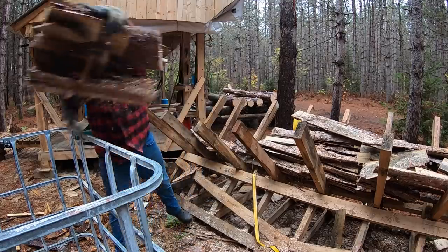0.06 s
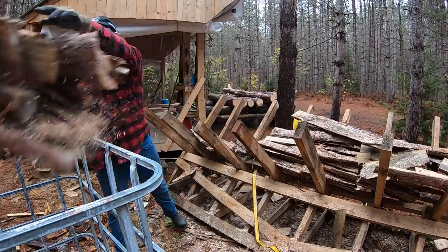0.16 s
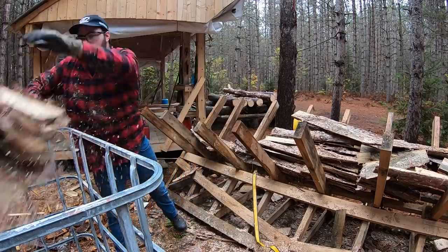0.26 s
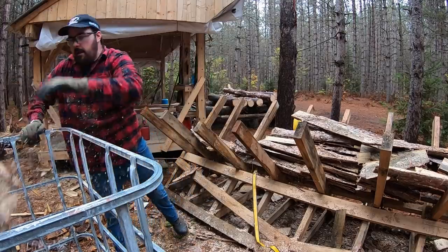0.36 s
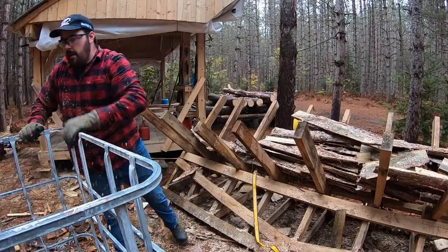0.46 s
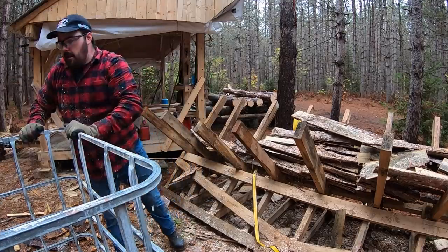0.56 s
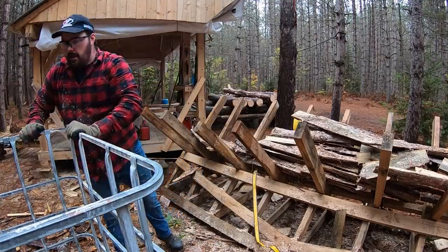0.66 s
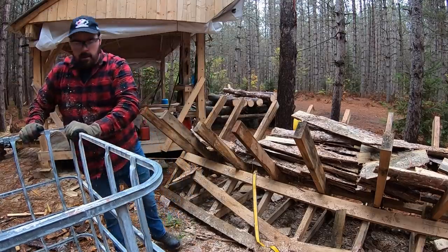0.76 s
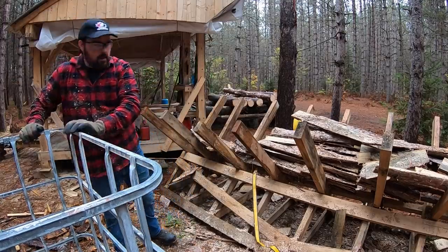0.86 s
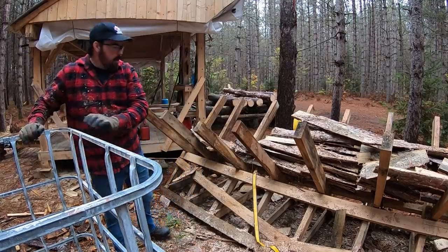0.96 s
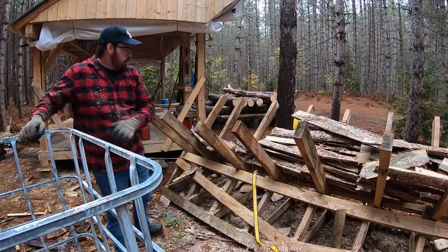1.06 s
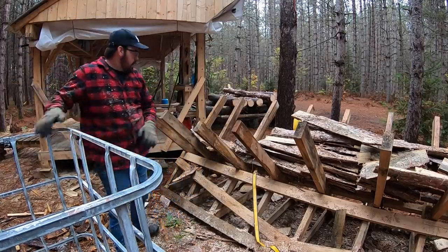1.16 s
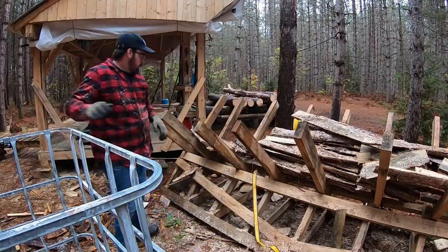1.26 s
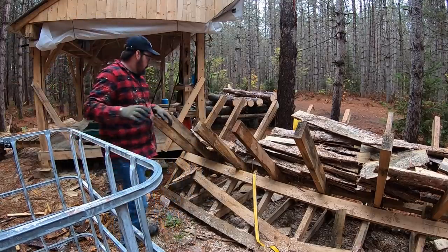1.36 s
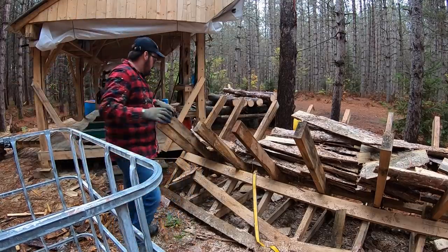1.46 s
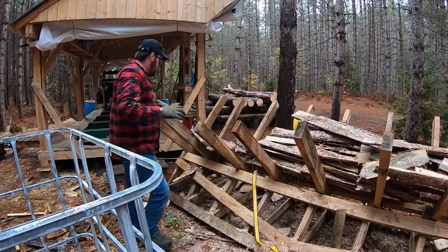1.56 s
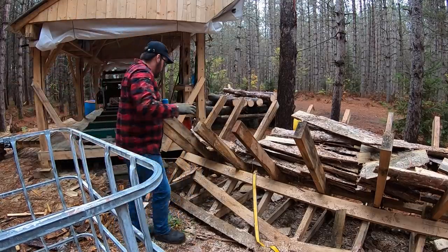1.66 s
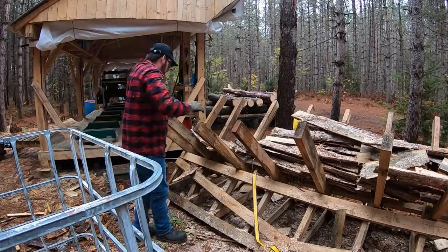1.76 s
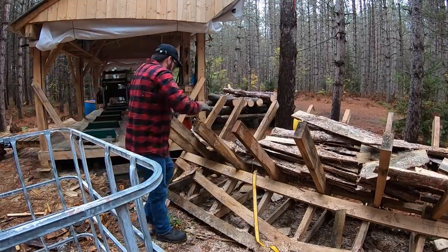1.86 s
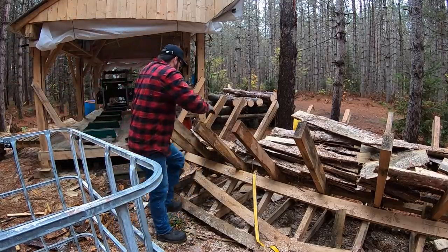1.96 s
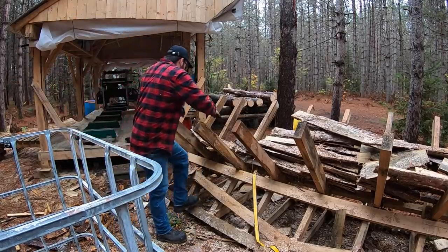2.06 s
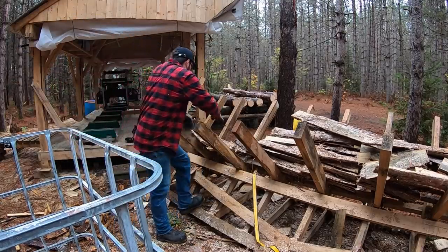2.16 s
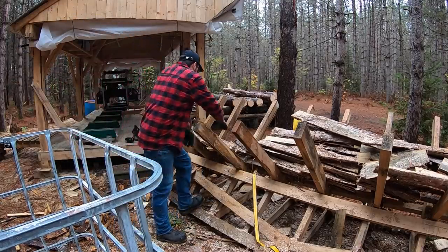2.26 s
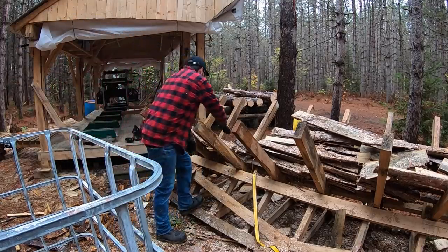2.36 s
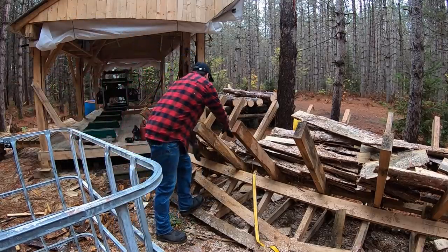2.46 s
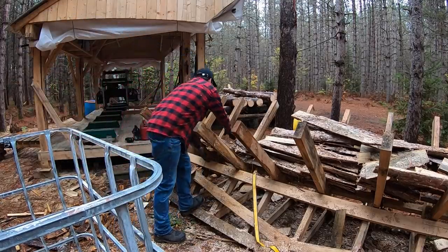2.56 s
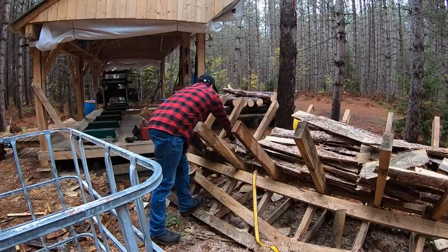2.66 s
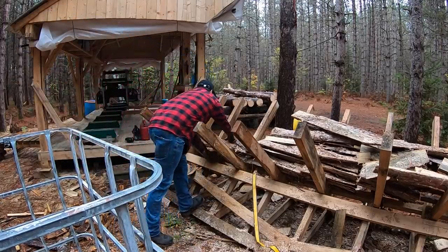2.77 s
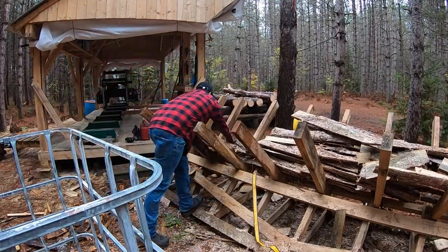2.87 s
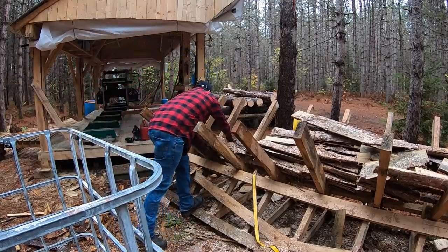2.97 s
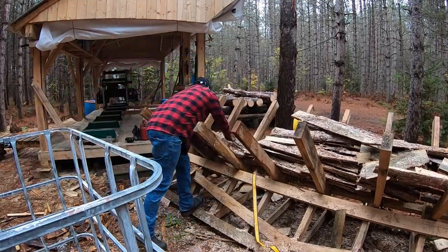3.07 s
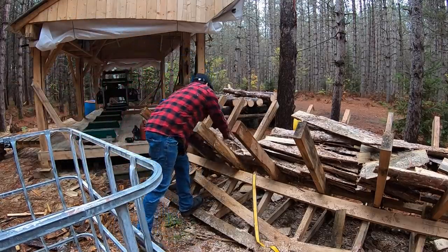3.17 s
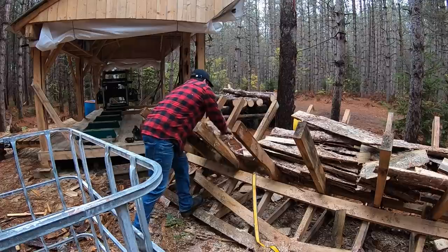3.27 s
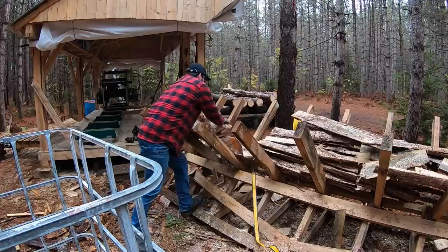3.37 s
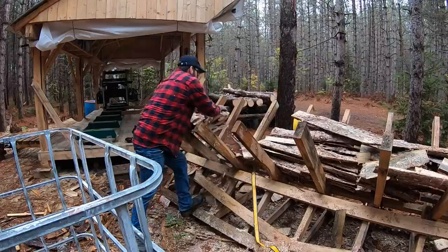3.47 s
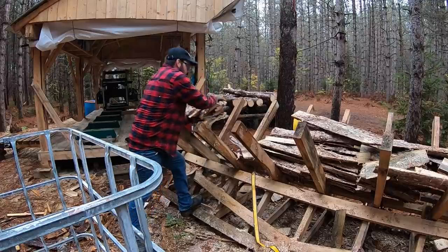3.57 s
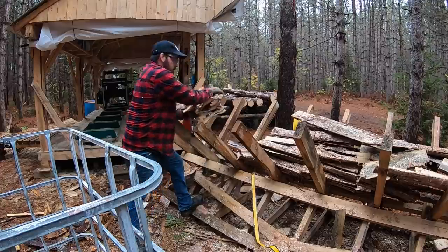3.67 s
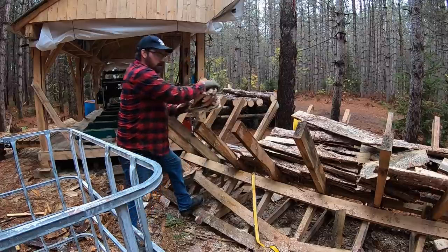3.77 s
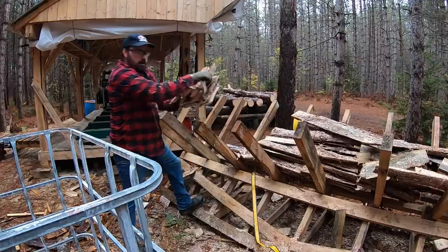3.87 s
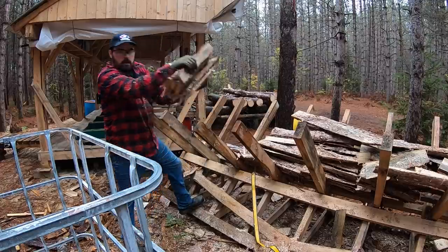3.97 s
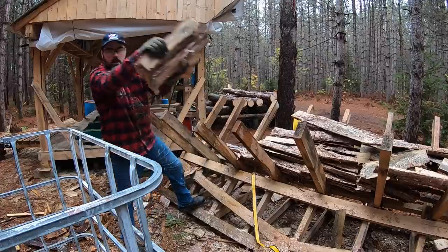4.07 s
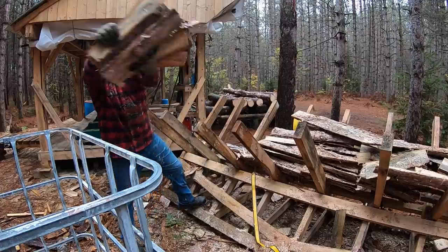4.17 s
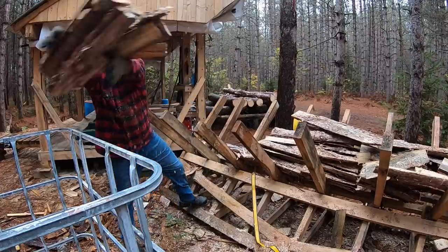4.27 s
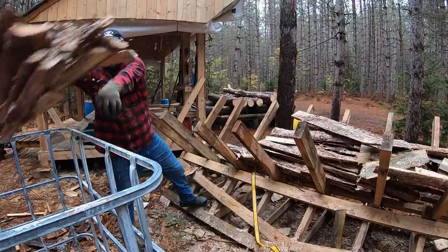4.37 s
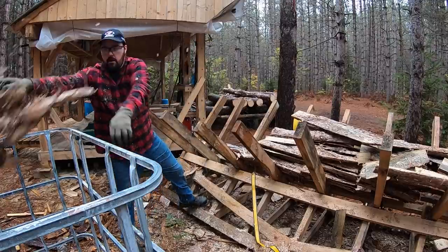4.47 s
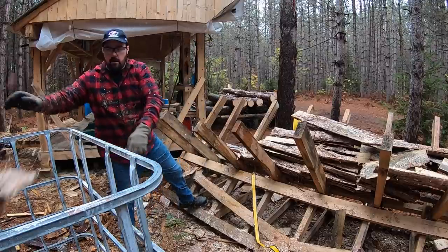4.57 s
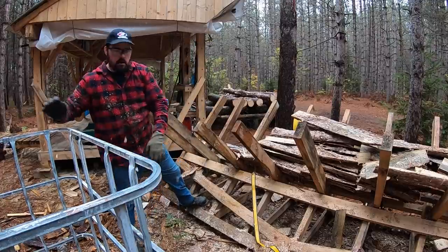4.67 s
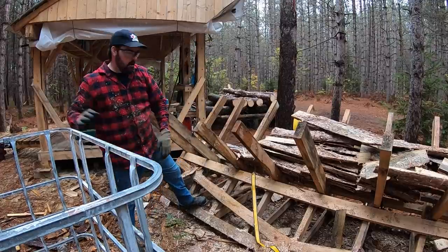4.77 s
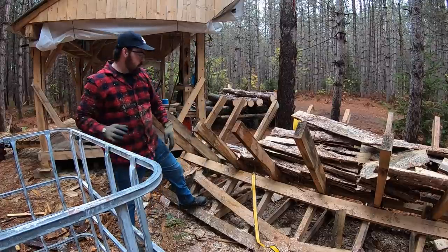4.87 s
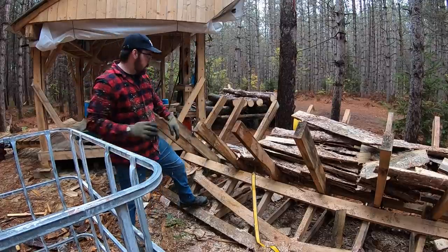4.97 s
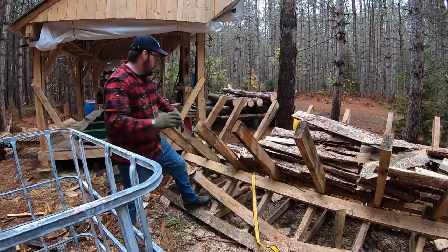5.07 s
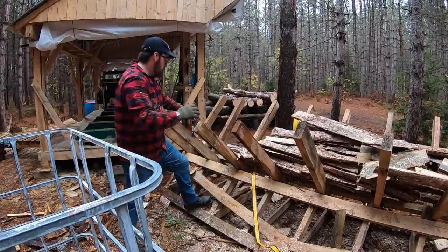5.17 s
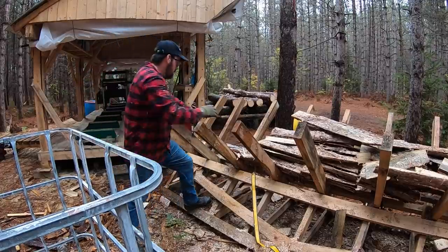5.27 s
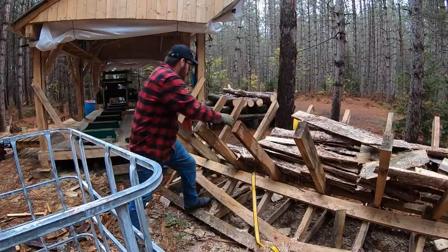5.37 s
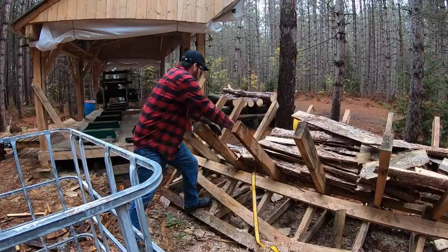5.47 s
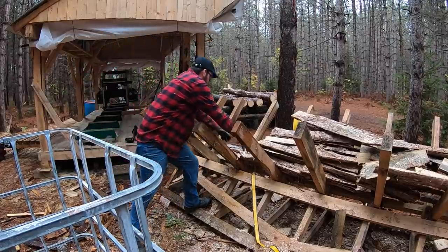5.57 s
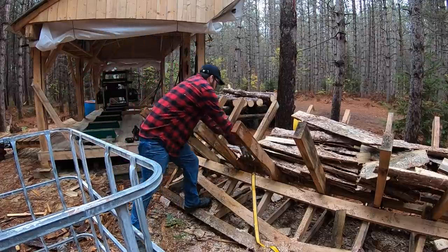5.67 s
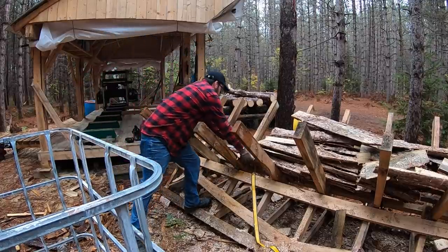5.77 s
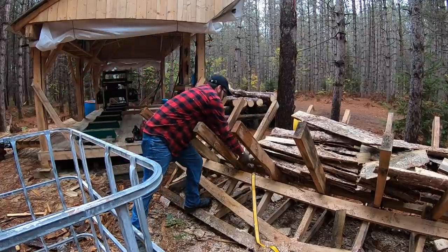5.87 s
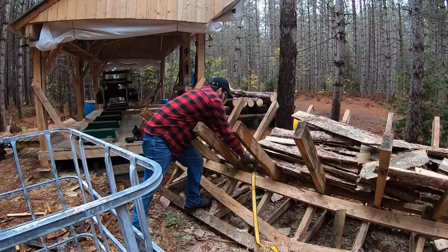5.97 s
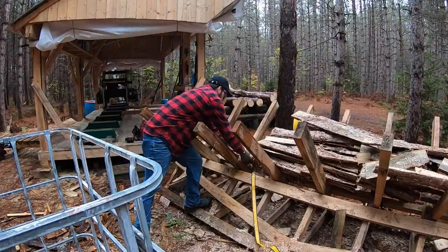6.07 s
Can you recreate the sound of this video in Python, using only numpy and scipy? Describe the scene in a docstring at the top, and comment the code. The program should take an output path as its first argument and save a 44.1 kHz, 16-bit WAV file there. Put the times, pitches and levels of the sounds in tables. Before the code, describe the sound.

An armful of split wood crashes into a steel cage, knocks and settles, then after quiet rustling a second armful clatters in, outdoors among trees.

```python
"""Firewood thrown into a steel cage

In a quiet yard, armfuls of split wood crash into a cage, tumble, settle and shed bark. Rough slabs
are dragged off a wooden rack before, between and after the throws. Struck wood and steel tubes are
sums of decaying modes; crunching faces and snapping bark are bursts of coloured noise, and rubbing
and crumbling are many tiny ticks. Low noise is the shaken ground, and the still air lies under it
all. Close reflections and a long faint tail from the pine forest answer the work."""
import sys
import numpy as np
from scipy import signal
from scipy.fft import rfft, irfft, next_fast_len
from scipy.io import wavfile
from scipy.ndimage import map_coordinates

SR = 44100
rng = np.random.default_rng(int(sys.argv[2]) if len(sys.argv) > 2 else 0)


def log_audio(samples):
    """Write samples as a 16-bit WAV file to the path given in sys.argv[1]."""
    # one column per channel
    frames = np.atleast_2d(samples).T
    # limit to full scale, then quantise
    limited = np.clip(frames, -1, 1)
    pcm = np.round(limited * 32767).astype(np.int16)
    wavfile.write(sys.argv[1], SR, pcm)


N = 269451
RING = np.arange(SR // 4) / SR  # time after a blow [s]
POWER_STEP = 32  # samples between the points of a movement's power curve


def amp(db):
    """Decibels to amplitude."""
    return 10 ** (np.asarray(db) / 20)


def unit(x):
    """Scale to rms 1."""
    return x / np.sqrt(np.mean(x ** 2) + 1e-20)


def peaked(x):
    """Scale to peak 1."""
    return x / np.abs(x).max()


def along(points, hz):
    """Read (frequency, value) points on a log frequency axis."""
    f, v = np.transpose(points)
    return np.interp(np.log(hz + 1), np.log(f + 1), v)


def curves(rows):
    """One value per sample for each column after the time."""
    s, *cols = np.transpose(rows)
    return [np.interp(np.arange(N) / SR, s, c) for c in cols]


def filtered(x, response):
    """Multiply the spectrum of x by a response of frequency."""
    n = x.shape[-1]
    m = next_fast_len(n + 8192)
    spectrum = rfft(x, m) * response(np.fft.rfftfreq(m, 1 / SR))
    return irfft(spectrum, m)[..., :n]


# How alike left and right are: (frequency [Hz], correlation [-1 to 1])
LIKENESS = [(40, 0.089), (130, 0.41), (300, 1), (700, 0.31), (2300, 0.88), (4500, 0.91), (8000, 0.045),
            (14000, -0.32)]


def spread(pair, spectrum):
    """Two unrelated signals become coloured stereo of rms 1; mid against side sets the likeness."""
    def mid_side(hz):
        turn = np.arccos(np.clip(along(LIKENESS, hz), -1, 1)) / 2
        return amp(along(spectrum, hz)) * [np.cos(turn), np.sin(turn)]

    mid, side = filtered(pair, mid_side)
    return unit(np.array([mid + side, mid - side]))


def noise(spectrum, size):
    """Coloured stereo noise of rms 1."""
    return spread(rng.standard_normal((2, size)), spectrum)


def fade(t60, attack):
    """The envelope of one blow; both times in seconds."""
    return amp(-60 * RING / max(t60, .003)) * (1 - np.exp(-RING / max(attack, 1 / SR)))


def add(track, s, sound):
    """Mix a sound into a stereo track at time s."""
    part = track[:, max(round(s * SR), 0):][:, :sound.shape[-1]]
    part += sound[..., :part.shape[1]]


def wobble(rate):
    """A smooth random curve, rate knots a second."""
    knots = rng.standard_normal(int(N * rate / SR) + 4)
    return map_coordinates(knots, [np.arange(N) * rate / SR])


# Where the handled wood is heard: (time [s], left over right [dB])
HANDLING_PLACE = [(.2, -7), (.6, -3.5), (1.3, -1), (3.2, 1.5), (3.9, 0.5), (4.3, -9), (5.1, 0), (5.3, 0)]


def placed(x):
    """The handling moves between the right and the middle, at moments a little to the left."""
    pan_db, = curves(HANDLING_PLACE)
    return x * amp([pan_db / 2, -pan_db / 2])


def power(start, end, attack, db_per_s):
    """Power of a movement: it builds from start, holds until end, then dies away."""
    t = np.arange(0, N, POWER_STEP) / SR
    build = 1 - np.exp(-np.maximum(t - start, 0) / attack)
    decay = amp(-db_per_s * np.maximum(t - end, 0))
    return (build * decay) ** 2


def level(powers):
    """The gain per sample of several movements together."""
    return np.interp(np.arange(N), np.arange(0, N, POWER_STEP), np.sqrt(sum(powers)))


# The still air of the yard: (frequency [Hz], relative level [dB])
AIR_SPECTRUM = [(15, -45), (25, -7), (54, 0), (106, -40.5), (301, -35), (363, -5.5), (427, -12.5),
                (488, -19.5), (691, -6.5), (1150, -18), (2630, -32), (5570, -33.5), (15000, -43.5)]


def still_air():
    """The quiet yard is a faint steady bed of coloured noise."""
    return amp(-64.5) * noise(AIR_SPECTRUM, N)


STROKE_SWELL, STROKE_FADE = 0.25, 3.7  # attack and t60 of a stroke, as multiples of its length


def stroke(start, end):
    """Power of one pull: the longer it is, the more slowly it gathers and loses speed."""
    length = abs(end - start) + 1 / SR
    return power(start, end, STROKE_SWELL * length, 60 / (STROKE_FADE * length))


LANDING_ATTACK_S = 0.0044
FALL_DB_PER_S = 174.5  # the load comes to rest quickly once the last piece is down ...
CREEP_DB, CREEP_DB_PER_S = -5.5, 25  # ... but a part of it creeps on and dies away slowly


def settling(start, end, creep_db, db_per_s):
    """Power of a landing armful: a short fall, then a long creep."""
    fall = power(start, end, LANDING_ATTACK_S, FALL_DB_PER_S)
    creep = power(start, end, LANDING_ATTACK_S, db_per_s)
    return fall + amp(creep_db) ** 2 * creep


def grains(spectrum, hz, rate, scatter_db):
    """Tiny fractures of uneven size and pitch, each dead within a few cycles, over a softer hiss."""
    count = int(rate * N / SR)
    t = RING[:SR // 200]
    start = rng.integers(0, N, count)
    pitch, left, right = rng.standard_normal((count, 3)).T[..., None]
    size = amp(scatter_db * np.minimum(rng.exponential(size=(count, 1)), 3))
    cycles = np.minimum(hz * 2 ** (.7 * pitch), SR / 3) * t
    ticks = size * np.sin(2 * np.pi * cycles) * np.exp(-cycles / 1.5)
    where = (start[:, None] + np.arange(len(t))).ravel()
    pair = np.array([np.bincount(where, (ticks * side).ravel())[:N] for side in (left, right)])
    hiss = amp(-4) * rng.standard_normal((2, N))
    return spread(unit(pair) + hiss, spectrum)


# Wood dragged, swung or slipping:
# (start [s], end [s], rubbing level [dB], crumbling bark level [dB])
STROKES = [(0, 0.114, -55.5, -61), (0.092, 0.284, -42, -45.5), (0.891, 0.932, -32.5, -37),
           (1.132, 1.198, -46, -51.5), (2.665, 2.899, -59.5, -62), (2.95, 3.122, -48, -49),
           (3.102, 3.378, -49, -49.5), (3.572, 3.647, -45.5, -46), (3.62, 3.919, -53.5, -55),
           (4.05, 4.55, -60, -60.5), (4.331, 4.396, -56.5, -51), (4.921, 5.08, -40.5, -44.5),
           (5.315, 5.426, -66, -49), (5.883, 5.992, -46.5, -53), (6.05, 6.1, -55, -59)]
# Bursts of armfuls tumbling into the cage: (start [s], end [s], small-contact level [dB],
# steel ring level [dB], rubbing level [dB], crumbling bark level [dB], rumble level [dB])
LANDINGS = [(.25, 0.334, -21, -32, -34, -35.5, -29), (0.497, .615, -16.5, -35, -36.5, -38.5, -26.5),
            (4.709, 4.825, -20, -37.5, -36.5, -40.5, -29.5)]
# Sawn faces rubbing: (frequency [Hz], relative level [dB])
RUB_SPECTRUM = [(60, -19.5), (160, 4), (350, 0), (700, 0.5), (1500, -1.5), (2300, 0.5), (3500, -0.5),
                (7000, -30), (14000, -53.5)]
# Dry bark crumbling or snapping: (frequency [Hz], relative level [dB])
BARK_SPECTRUM = [(300, -39.5), (1200, -5.5), (2500, -3.5), (4800, -2.5), (7000, -3.5), (9300, -2.5),
                 (15000, -14)]


def sliding():
    """Sawn faces catch and slip in jerks and dry bark crumbles, in every stroke and settling load."""
    moves = [(stroke(start, end), rub_db, bark_db) for start, end, rub_db, bark_db in STROKES]
    for start, end, _, _, rub_db, bark_db, _ in LANDINGS:
        moves.append((settling(start, end, CREEP_DB, CREEP_DB_PER_S), rub_db, bark_db))
    rubbing = level(move * amp(rub_db) ** 2 for move, rub_db, _ in moves)
    crumbling = level(move * amp(bark_db) ** 2 for move, _, bark_db in moves)
    jerk_db = 3.0 * wobble(30)
    rub = grains(RUB_SPECTRUM, hz=1800, rate=2400, scatter_db=2.0)
    bark = grains(BARK_SPECTRUM, hz=6500, rate=3000, scatter_db=4)
    return amp(jerk_db) * (rubbing * placed(rub) + crumbling * bark)


DRAG_SHAKE_DB = -9.5  # rumble of the stack under a stroke, against its rubbing
RUMBLE_CREEP_DB, RUMBLE_DB_PER_S = -7, 20.5  # slow part of a settling load's rumble
# ground rumble against a slab of pitch SHAKE_HZ; higher-pitched, lighter slabs shake it less
SHAKE_DB, SHAKE_HZ, SHAKE_DB_PER_OCTAVE = -14, 122, -17.5
SHAKE_ATTACK_S, SHAKE_DB_PER_S = 0.044, 84.5
# The shaken stack and ground: (frequency [Hz], relative level [dB])
RUMBLE_SPECTRUM = [(15, -9.5), (35, 4), (75, -0.5), (130, -2.5), (250, -4.5), (500, -20.5), (2000, -91)]


def shaking():
    """The settling load rumbles deep down; every pull and each slab shakes the stack and the ground."""
    shakes = []
    for start, end, *_, db in LANDINGS:
        shakes.append(amp(db) ** 2 * settling(start, end, RUMBLE_CREEP_DB, RUMBLE_DB_PER_S))
    for start, end, rub_db, _ in STROKES:
        shakes.append(amp(rub_db + DRAG_SHAKE_DB) ** 2 * stroke(start, end))
    for s, db, hz, _ in SLAB_LANDINGS:
        shake_db = db + SHAKE_DB + SHAKE_DB_PER_OCTAVE * np.log2(hz / SHAKE_HZ)
        shakes.append(amp(shake_db) ** 2 * power(s, s, SHAKE_ATTACK_S, SHAKE_DB_PER_S))
    return level(shakes) * noise(RUMBLE_SPECTRUM, N)


# How long the far trunks answer: (frequency [Hz], t60 [s])
FOREST_T60 = [(100, 1), (400, 1.2), (1500, 0.47), (4000, 0.82), (10000, 1.5)]
# Colour of the reflections, near and far: (frequency [Hz], relative level [dB])
ECHO_SPECTRUM = [(60, 1), (250, -29.5), (700, 4), (2000, 0), (6000, 5), (12000, -1.5)]


def forest(x):
    """Ground and shed reflect at once; the trunks scatter a long faint tail."""
    hz, t, z = signal.stft(rng.standard_normal((2, SR)), SR, nperseg=256)
    tail_db = along(ECHO_SPECTRUM, hz)[:, None] - 60 * t / along(FOREST_T60, hz)[:, None]
    tail = signal.istft(z * amp(tail_db), SR, nperseg=256)[1]
    near = noise(ECHO_SPECTRUM, len(RING)) * fade(t60=.15, attack=.015)

    def answer(h):
        return signal.fftconvolve(x, h / np.linalg.norm(h[0]), axes=1)[:, :N]

    return amp(-15) * answer(near) + amp(-26.5) * answer(tail)


def wood(modes, hz, t60, attack, overtone_db, damping):
    """A struck piece: its higher modes die sooner, and no two pieces have quite the same shape."""
    ring = np.zeros(len(RING))
    variations = rng.standard_normal((len(modes), 2))
    for k, ((ratio, db), (shape, place)) in enumerate(zip(modes, variations)):
        detune = 1 + .06 * shape * np.log(ratio)
        # overtones tilt by octave; the weaker modes vary with the place of the blow
        mode_db = db + overtone_db * np.log2(max(ratio, 1)) + 2 * place * (db < -4)
        tone = np.sin(2 * np.pi * hz * ratio * detune * RING)
        ring += (-1) ** k * amp(mode_db) * tone * fade(t60 / ratio ** damping, attack)
    return peaked(ring)


# Modes of a short split piece: (multiple of its pitch [ratio], relative level [dB])
SPLIT_MODES = [(.34, -12.5), (.44, -15.5), (.62, -5), (.69, -14), (.87, -4), (1, 0), (1.17, -4.5),
               (1.37, -8), (1.62, -13.5), (2.1, -21), (2.6, -25.5)]
# Rough faces crunching, for a piece of 1300 Hz: (frequency [Hz], relative level [dB])
CRUNCH_SPECTRUM = [(100, -23.5), (350, 2), (900, -6.5), (1900, 4), (3200, -5), (5500, -14), (9300, -23),
                   (15000, -25)]


def clack(hz, t60, crunch_db):
    """A short piece rings over the crunch of its rough faces; smaller pieces crunch higher."""
    ring = wood(SPLIT_MODES, hz, t60, attack=.0014, overtone_db=-2, damping=.5)
    colour = [(f * np.sqrt(hz / 1300), db) for f, db in CRUNCH_SPECTRUM]
    crunch_fade = fade(t60=0.037, attack=.001) + amp(-18.5) * fade(t60=.13, attack=.004)
    crunch = noise(colour, len(RING)) * crunch_fade
    return amp(-1) * ring + amp(crunch_db - 5) * crunch


CATCH_PER_S, CATCH_HZ = 14, 1745  # edges catching in a stroke, and their middle pitch
CATCH_DB, CATCH_SCATTER_DB = 7, 2.5  # level against the stroke's rubbing, and its spread each way


def catches():
    """Rough edges catch and let go during the strokes, in small woody ticks of varied pitch."""
    out = np.zeros((2, N))
    for start, end, rub_db, _ in STROKES:
        count = int(CATCH_PER_S * abs(end - start))
        for when, force, piece in rng.uniform(-1, 1, (count, 3)):
            s = start + (end - start) * (.6 + .4 * when)
            tick = clack(CATCH_HZ * 2 ** piece, t60=.04, crunch_db=-5.5)
            add(out, s, amp(rub_db + CATCH_DB + CATCH_SCATTER_DB * force) * tick)
    return out


# Bark and splinters snapping: (time [s], level before a 2 dB lift [dB])
BARK_SNAPS = [(0.0704, -35), (0.4824, -14.5), (.964, -20.5), (1.0954, -33.5), (1.3909, -32), (1.623, -45.5),
              (1.872, -49), (2.819, -22.5), (3.277, -25.5), (3.6152, -26), (3.939, -37.5), (4.655, -33),
              (4.7011, -17)]


def snaps():
    """A brittle flake breaks within milliseconds, with a brief rustle after it."""
    out = np.zeros((2, N))
    for s, db in BARK_SNAPS:
        envelope = fade(t60=0.0099, attack=0.00021) + amp(-16) * fade(t60=.04, attack=.001)
        burst = noise(BARK_SPECTRUM, len(RING)) * envelope
        add(out, s, amp(db + 2) * peaked(burst))
    return out


# a piece rings this many cycles after a 0 dB blow, twice as many when this much softer
RING_CYCLES, PINNED_DB = 31, 27.5
# Hard contacts of wood on wood:
# (time [s], level [dB], pitch of the piece [Hz], crunch of the faces before a 5 dB cut [dB])
HARD_CONTACTS = [(0.172, -25.5, 900, 3), (.245, -13.5, 1140, -2), (.263, -10.5, 1490, -11.5),
                 (.295, -14, 1206, 1), (.332, -12, 1190, -11.5), (.475, -20, 903, -1.5),
                 (0.501, -16, 3650, -6), (.52, -15.5, 4570, 3.5), (.576, -10, 1030, 0),
                 (0.586, -4.5, 1770, -13.5), (0.63, -8.5, 960, -10), (0.793, -9.5, 1806, -44),
                 (.884, -17.5, 1325, -20.5), (.944, -18.5, 718, 1), (0.99, -23, 1336, 1.5),
                 (1.171, -32, 1053, 2), (1.277, -29.5, 4540, -5), (1.307, -21, 804, -8),
                 (2.933, -33.5, 1333, 1), (3.097, -35.5, 1296, 5.5), (3.221, -22.5, 1040, 1.5),
                 (3.616, -19.5, 1353, -8), (3.667, -32.5, 928, -4), (3.748, -34.5, 1133, 4.5),
                 (3.871, -41.5, 945, 1.5), (3.98, -41, 1020, 1.5), (4.157, -47, 1730, 11),
                 (4.259, -36.5, 2320, 1), (4.694, -19, 2410, 1), (4.713, -9.5, 1846, 2.5),
                 (4.725, -5.5, 1505, -15), (4.756, -13.5, 1680, -26), (4.773, -11.5, 950, 1.5),
                 (4.805, -12, 1230, -5.5), (4.846, -12, 1154, 0.5), (4.858, -13, 1418, 2),
                 (5.062, -23, 825, -31), (5.091, -20, 1960, -16.5), (5.118, -24, 1260, -23.5),
                 (5.241, -32.5, 742, -1.5), (5.283, -19.5, 682, -4.5), (5.308, -24, 907, 2),
                 (5.388, -31.5, 746, 6.5), (5.549, -22, 719, 8), (5.552, -19, 2310, -11),
                 (5.657, -35, 1330, -2), (5.691, -37.5, 1480, 6), (5.997, -31.5, 2480, 4)]


def clacks():
    """Pieces strike the load, the rack and each other; small or hard-pressed ones ring shortest."""
    out = np.zeros((2, N))
    for s, db, hz, crunch_db in HARD_CONTACTS:
        t60 = RING_CYCLES / hz * 2 ** (-db / PINNED_DB)
        add(out, s, amp(db) * clack(hz, t60, crunch_db))
    return out


def tumble(count=13):
    """While an armful lands, its pieces jostle in a quick run of smaller contacts."""
    out = np.zeros((2, N))
    for start, end, db, *_ in LANDINGS:
        for k, (when, force, piece) in enumerate(rng.uniform(-1.2, 1, (count, 3))):
            s = start + (end - start) * (k + .5 + when / 2) / count
            contact = clack(1200 * 2 ** (.9 * piece), t60=0.074, crunch_db=-4)
            add(out, s, amp(db + 2.3 * force) * contact)
    return out


# Modes of the cage's steel tubes: (frequency [Hz], relative level [dB], t60 [s])
TUBE_MODES = [(70.6, 5.5, 0.73), (198.4, 10, 0.68), (799, 2, 0.6), (751, 4.5, 0.8), (1007, -6.5, .4),
              (1750, -17.5, .6), (2345, -8, .6), (3460, -10.5, 0.5)]


def cage():
    """The steel tubes swell as each armful lands and ring on after it."""
    out = np.zeros((2, N))
    age = np.arange(SR) / SR
    for start, _, _, steel_db, *_ in LANDINGS:
        tubes = np.zeros(SR)
        for hz, mode_db, t60 in TUBE_MODES:
            tubes += amp(mode_db - 60 * age / t60) * np.sin(2 * np.pi * (hz * age + rng.random()))
        add(out, start, amp(steel_db) * tubes * (1 - np.exp(-age / 0.026)))
    return out


# Bending modes of a long slab: (multiple of its pitch [ratio], relative level [dB])
SLAB_MODES = [(.52, -26.5), (.74, -6), (1, 5), (1.14, -11), (1.38, -4.5), (1.93, -8), (2.46, -13),
              (3.2, -13), (3.9, -18.5)]
# The dull push of a slab: (frequency [Hz], relative level [dB])
PUSH_SPECTRUM = [(25, -20.5), (70, 2.5), (130, -17.5), (260, 6.5), (450, -2), (800, -17.5), (1600, -24),
                 (5000, -43.5), (15000, -75)]


def thud(hz, overtone_db, t60):
    """Long slabs meet softly, so their low bending modes swell over a dull push."""
    ring = wood(SLAB_MODES, hz, t60, attack=0.0063, overtone_db=overtone_db, damping=0.5)
    push = noise(PUSH_SPECTRUM, len(RING)) * fade(t60=0.23, attack=0.015)
    return amp(-2) * ring + amp(-12) * push


# ring of a slab after a 0 dB blow; it doubles when the blow is this much softer
SLAB_T60_S, SLAB_PINNED_DB = 0.075, 47
# Heavy slabs landing:
# (time [s], level [dB], pitch of the slab [Hz], overtone tilt [dB per octave])
SLAB_LANDINGS = [(0.268, -7.5, 211.5, 9), (.3, -10, 189, 6), (0.334, -17.5, 191, -8), (.476, -21, 403, -1),
                 (0.491, -18, 128.6, 9), (0.547, -8, 123.3, 6), (0.564, -6, 206.5, 10),
                 (.595, -6, 144.3, 4.5), (.901, -2.5, 224.5, -1.5), (.943, -17.5, 421.5, -10),
                 (0.992, -20.5, 218, -9), (1.085, -31.5, 135, -10), (1.195, -20.5, 189, -3),
                 (1.304, -15, 370, 1), (1.391, -30.5, 160, 4), (1.711, -27, 287, -2.5),
                 (1.895, -34.5, 216.6, -11), (1.98, -39, 221.4, -7), (2.227, -40.5, 121.8, 7),
                 (2.307, -47.5, 223, 1), (2.934, -41.5, 163.6, -5), (3.096, -36, 156, 15),
                 (3.211, -23, 182.3, 6), (3.222, -15.5, 437, 2.5), (3.427, -34.5, 190, 8),
                 (3.6, -26.5, 106.3, 3), (3.691, -43.5, 87, -14.5), (4.686, -22, 287, 6),
                 (4.706, -10.5, 252, 8), (4.743, -9.5, 151.7, 2.5), (4.771, -12.5, 265.4, -27),
                 (4.794, -9.5, 133.5, 6.5), (4.849, -10, 269.5, 4.5), (5.283, -17, 376, 2.5),
                 (5.291, -12.5, 133.7, 4), (5.308, -13, 297.5, -12), (5.321, -15, 199, -6),
                 (5.364, -16.5, 150, -3), (5.394, -11, 251.5, -0.5), (5.997, -32.5, 144.4, 11.5)]


def thuds():
    """Slabs land on the load or the rack; the harder they press, the sooner they are still."""
    out = np.zeros((2, N))
    for s, db, hz, overtone_db in SLAB_LANDINGS:
        t60 = SLAB_T60_S * 2 ** (-db / SLAB_PINNED_DB)
        add(out, s, amp(db) * thud(hz, overtone_db, t60))
    return out


ROCK_START_S, ROCK_GAP_S, ROCK_SHRINK = 1.171, .298, .712  # each gap is this fraction of the last
ROCK_DB, ROCK_LOSS_DB = -18, 4  # first contact, and the loss at each one after it
ROCK_HZ, ROCK_OVERTONE_DB, ROCK_T60_S = 217, -0.5, 0.18


def rocking(count=4):
    """A slab on top of the first armful tips to and fro, ever faster and softer."""
    out = np.zeros((2, N))
    for k in range(count):
        s = ROCK_START_S + ROCK_GAP_S * (1 - ROCK_SHRINK ** k) / (1 - ROCK_SHRINK)
        contact = thud(ROCK_HZ, ROCK_OVERTONE_DB, ROCK_T60_S)
        add(out, s, amp(ROCK_DB - ROCK_LOSS_DB * k) * contact)
    return out


def scene():
    """All the handling, its answer from the forest, the ground rumble and the still air."""
    handling = placed(clacks() + tumble() + catches() + cage())
    work = handling + thuds() + rocking() + snaps() + sliding()
    return work + forest(work) + shaking() + still_air()


TOP_HZ = 15700  # band limit
# Treble roll-off of the microphone: (frequency [Hz], level [dB])
MIC_RESPONSE = [(9600, 1), (11500, -7), (15000, -15.5)]


def record(dry):
    """The camera's microphone dulls the top treble; nothing above the band limit is kept."""
    return filtered(dry, lambda hz: amp(along(MIC_RESPONSE, hz)) * (hz < TOP_HZ))


dry = scene()
out = record(dry)
log_audio(out)
```